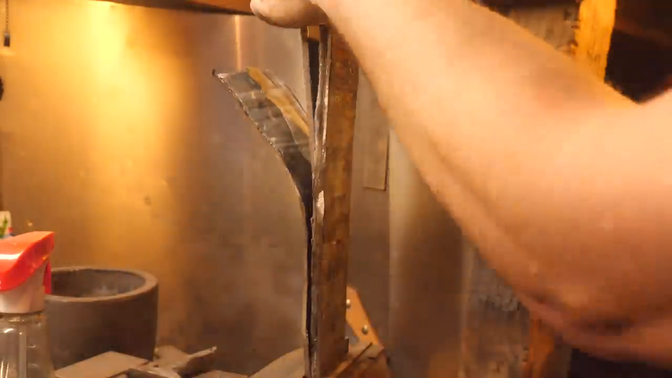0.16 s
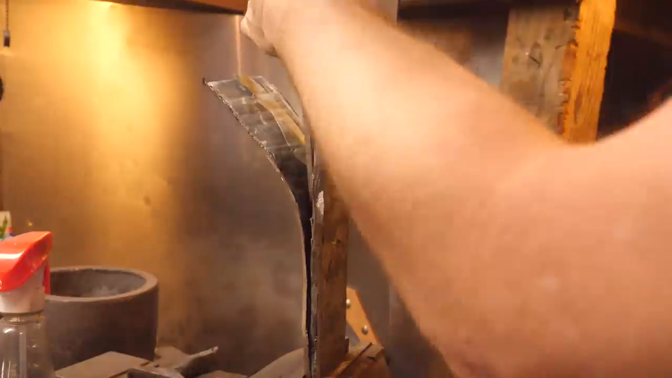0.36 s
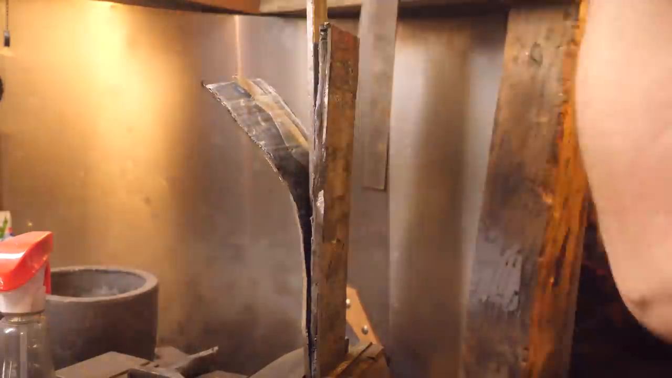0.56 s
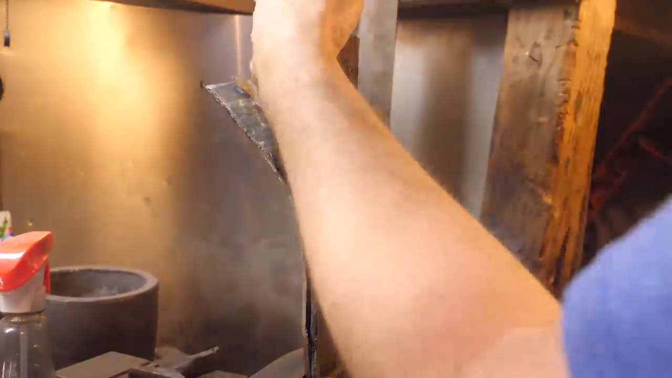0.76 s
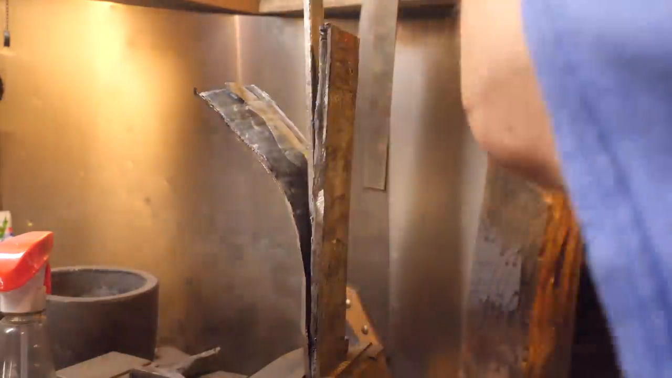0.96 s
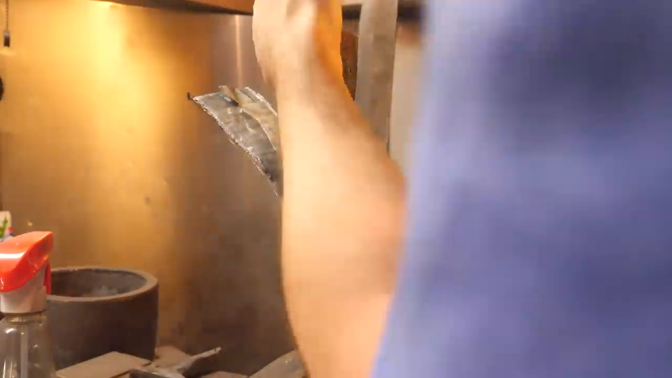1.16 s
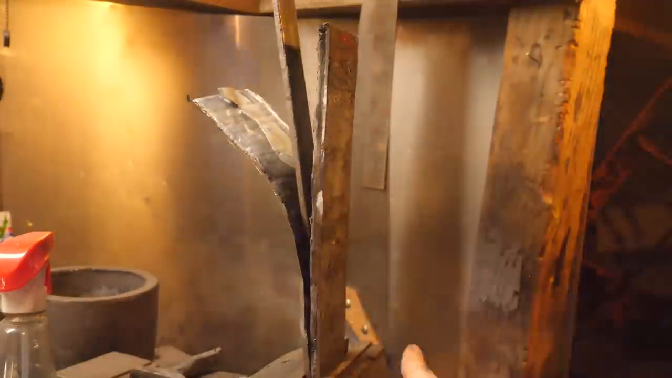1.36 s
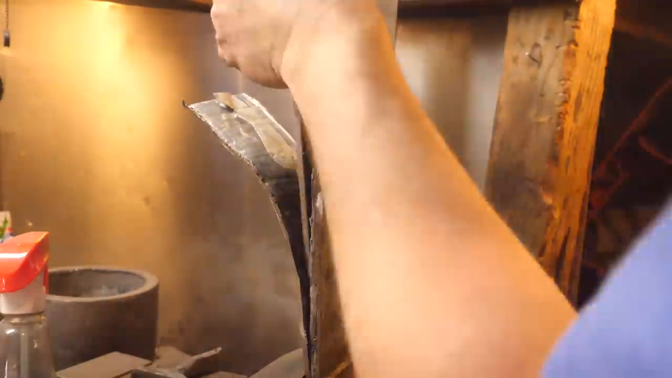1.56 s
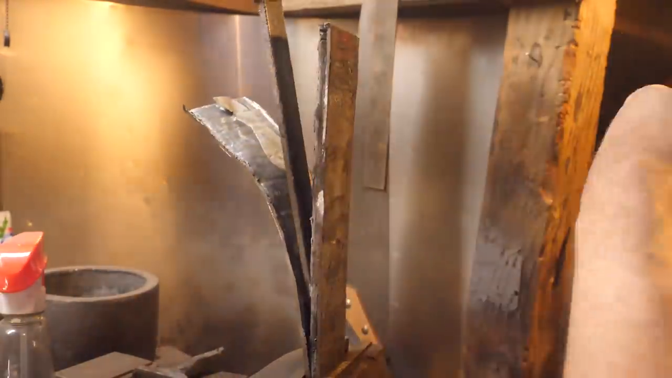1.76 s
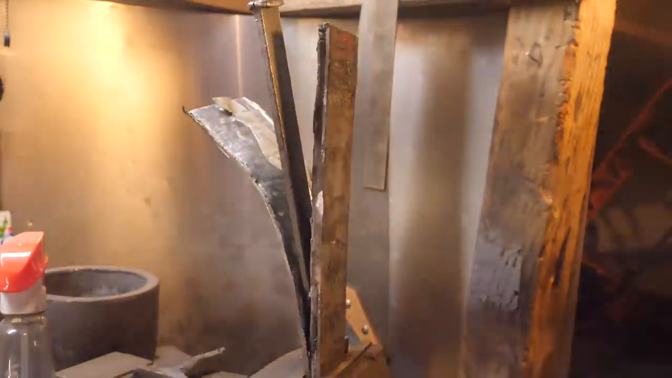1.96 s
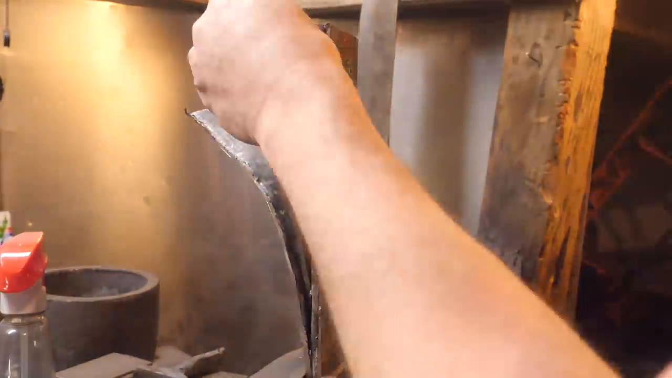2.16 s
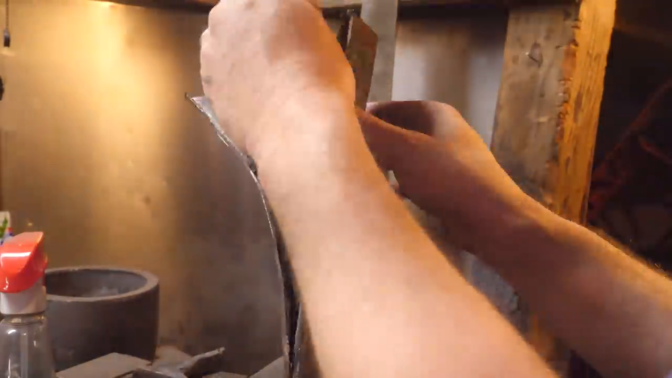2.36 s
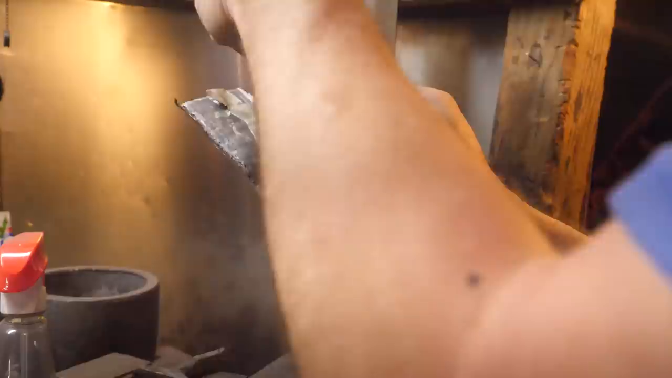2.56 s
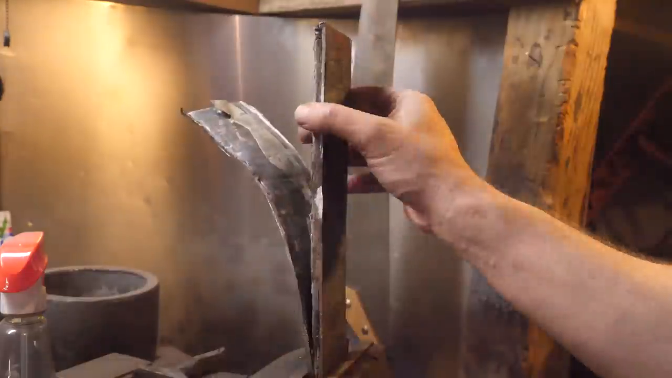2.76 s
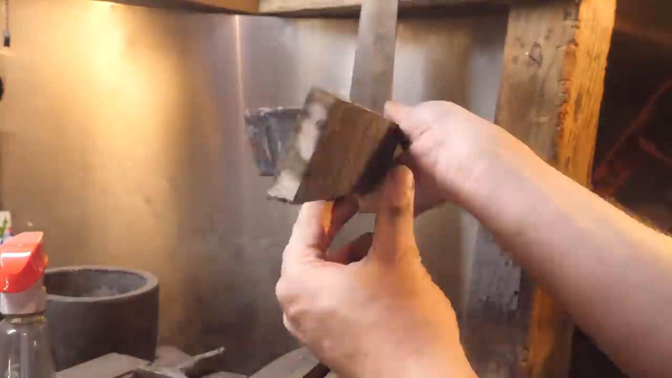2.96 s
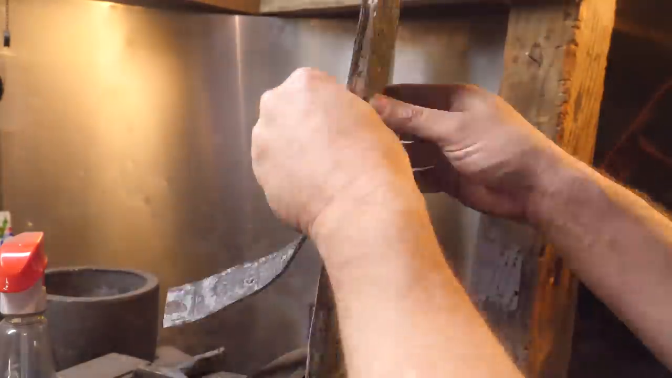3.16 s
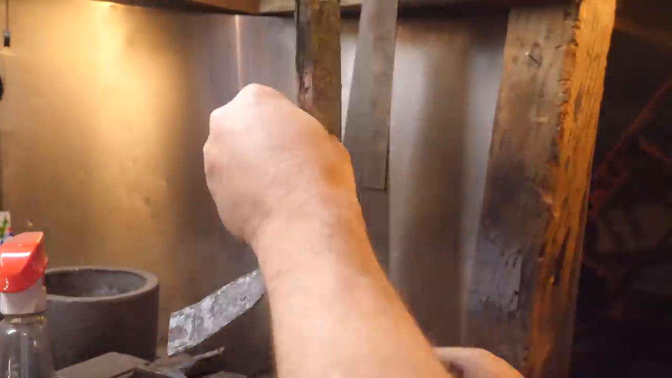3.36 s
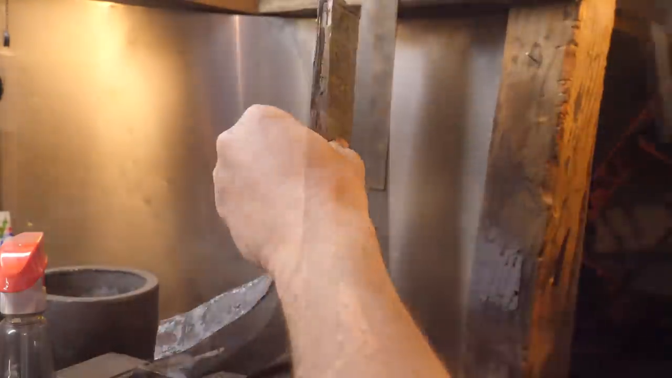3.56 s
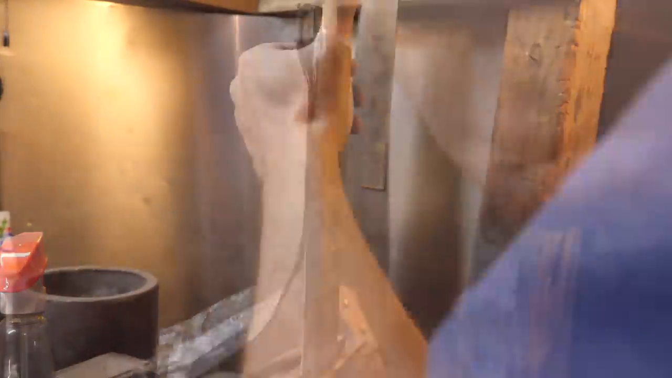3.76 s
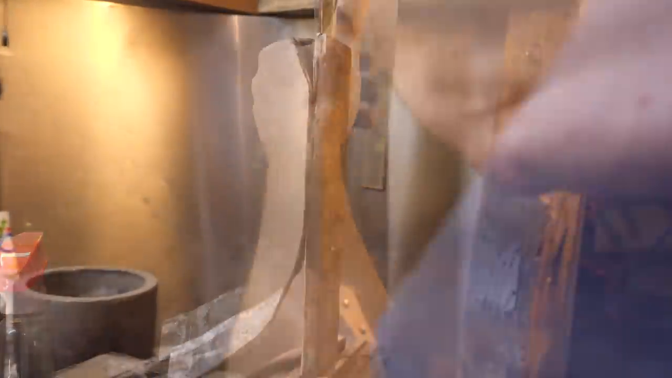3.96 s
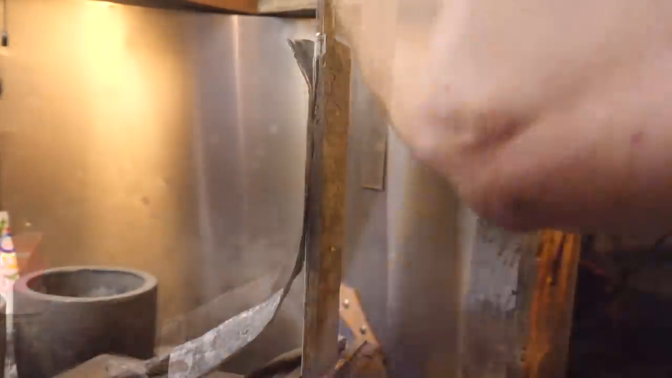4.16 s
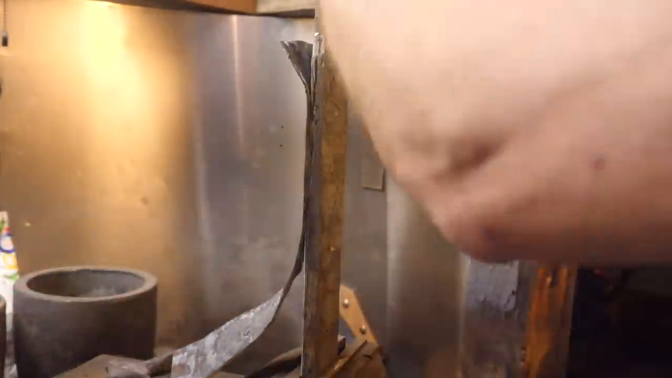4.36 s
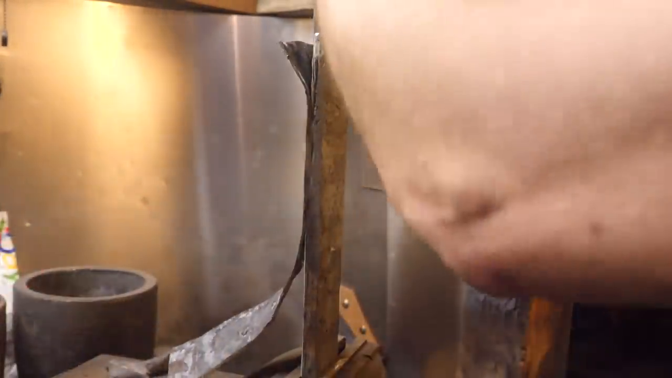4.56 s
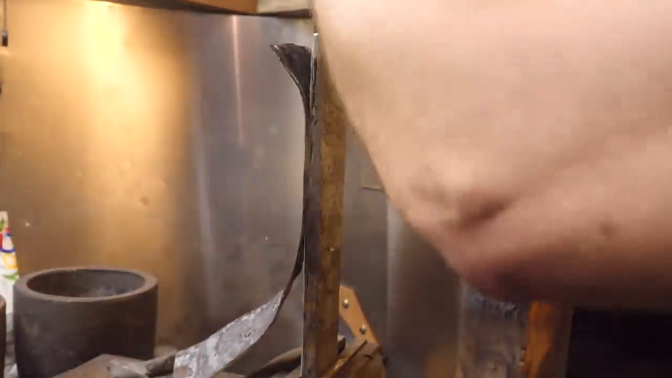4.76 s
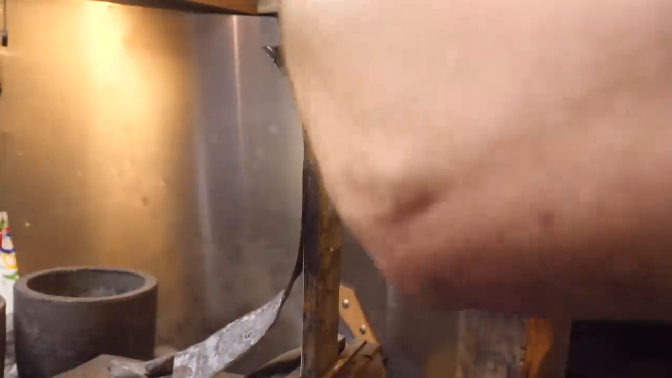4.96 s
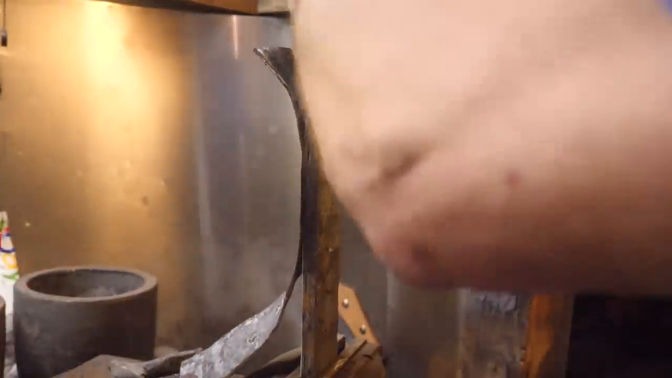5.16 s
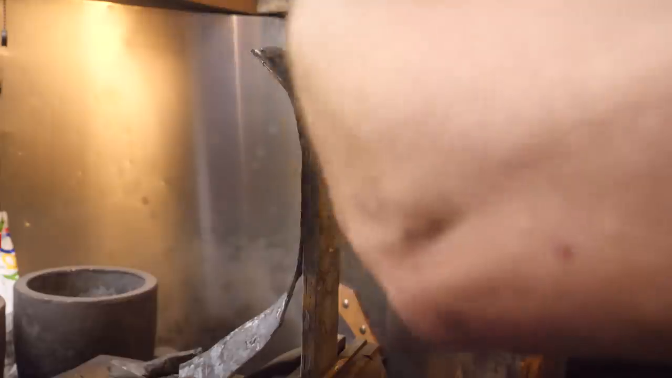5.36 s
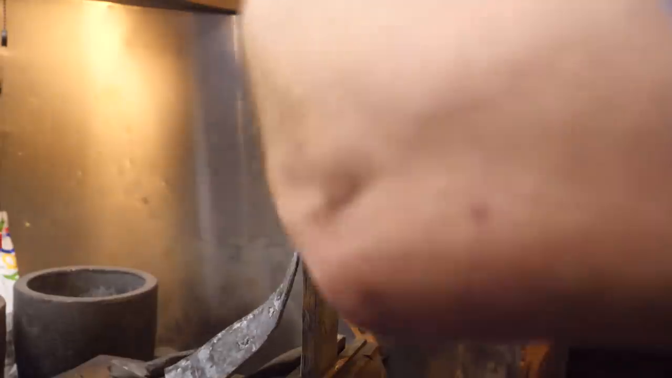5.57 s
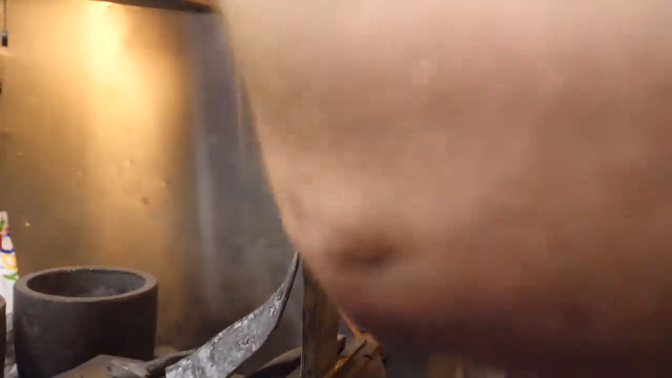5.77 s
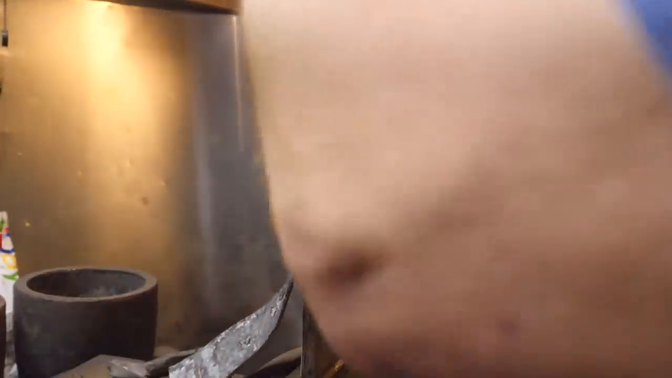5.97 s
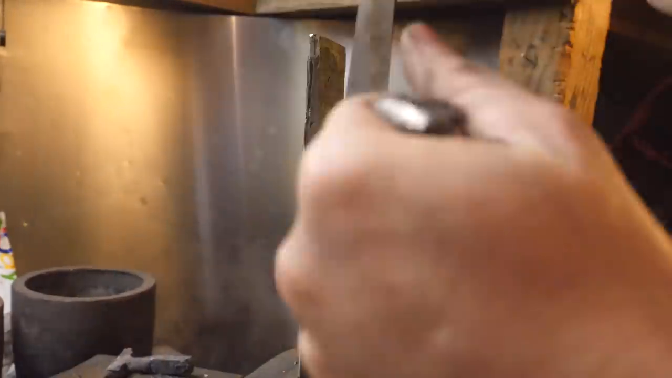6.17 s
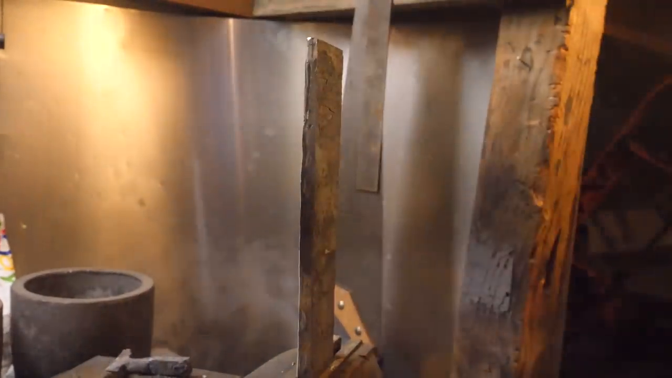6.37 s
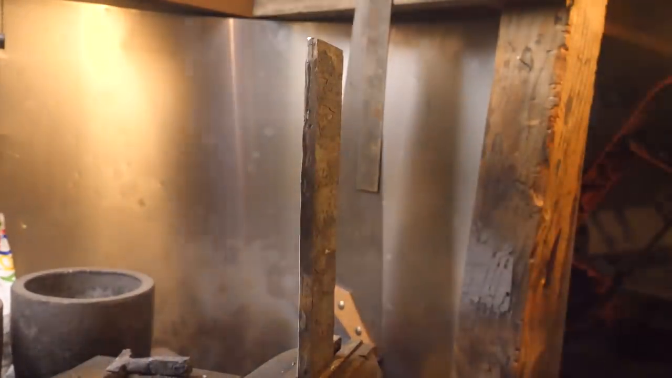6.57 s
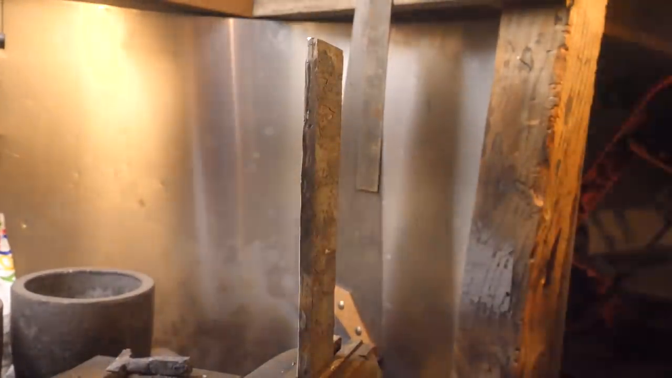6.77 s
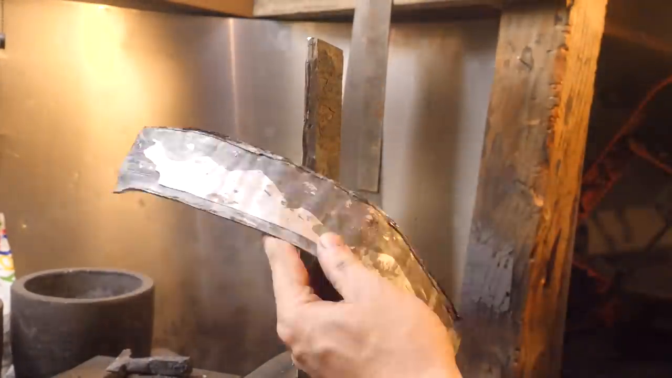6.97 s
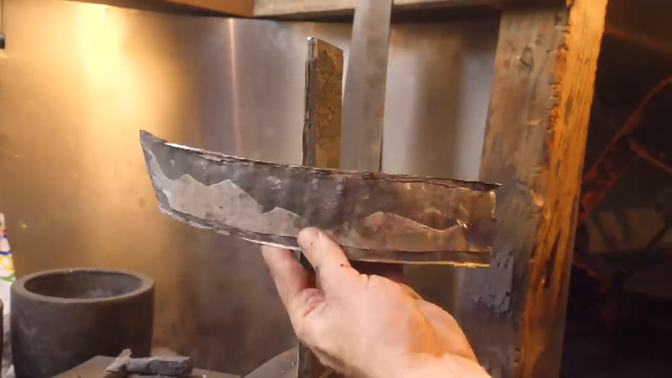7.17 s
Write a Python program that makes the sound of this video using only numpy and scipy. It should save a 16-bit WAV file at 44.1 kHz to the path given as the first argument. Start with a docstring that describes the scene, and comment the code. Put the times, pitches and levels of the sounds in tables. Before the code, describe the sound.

A small workshop heard close, with a heavy vise and bench. From 0 to 0.43 s, about 24 hard hammer blows a second ring off steel, each a bright crack, short dense ring and low boom. Blows become slower and uneven until 1.9 s, while a thin peeled strip begins to hum, falling in pitch. Room air sinks early. From 2.07 to 3.4 s, hands bend and knock the strip: dull knocks, hard clacks, sharp ticks and gritty scrapes. Around 3.45 s a fuller low rush of air enters, with two soft clacks. From 3.9 to 5.6 s, hammering is steady, about thirteen blows a second, with longer rings and a low wavering strip tone. Clatter at 5.7 s, three last blows near 6 s, then a strong scrape and rattling clang at 6.1-6.35 s. Light knocks follow over the air until just past 7 s.

```python
"""A small workshop: quick hammer blows drive a chisel down a steel bar in a vise and peel a thin strip off it,
in two runs. Each blow is a noise crack, a dense swelling ring, bar modes and a low boom; the strip sings along.
Between the runs the strip is bent, scraped and knocked by hand (filtered random slips); late on it clangs free.
A rush of air sinks early and returns fuller midway. Noise is drawn separately for left and right."""
import sys
import numpy as np
from scipy import signal
from scipy.fft import rfft, irfft, next_fast_len
from scipy.io import wavfile
from scipy.ndimage import uniform_filter1d, map_coordinates

SR = 44100
rng = np.random.default_rng(int(sys.argv[2]) if len(sys.argv) > 2 else 0)


def persist_wave(psi):
    """Save psi, clipped to +-1, as 16-bit WAV."""
    counts = np.round(np.clip(psi, -1, 1) * 32767).astype(np.int16)
    wavfile.write(sys.argv[1], SR, np.atleast_2d(counts).T)


N = 318446
TIME = np.arange(N) / SR
SPAN = np.arange(8192) / SR - 512 / SR  # time axis of one event [s], with a short lead-in

# hammer blows: (time [s], strength [dB], chisel note [Hz])
BLOWS = [(.0092, 1, 3470), (0.052, 0.5, 3497), (0.0969, 0, 4900), (.14, 0, 5100), (0.1833, 0.5, 5060),
         (0.2226, 0, 5370), (0.2639, -0.5, 5300), (.302, 0.5, 9780), (.341, -0.5, 9780),
         (0.3825, -0.5, 9780), (.4262, 0, 9900), (0.5385, -3, 5650), (0.594, -0.5, 9620), (.638, 0.5, 5350),
         (0.8075, -0.5, 5450), (0.8597, 1, 5500), (0.9339, -1, 3490), (0.9928, 2.4, 3666),
         (1.071, -2, 6130), (1.119, 1, 8400), (1.3473, -0.5, 3235), (1.4043, 0, 2020), (1.4648, -0.5, 5860),
         (1.5266, 0, 5290), (1.6778, -.5, 5450), (1.7436, 1.5, 5510), (1.815, -0.5, 3620),
         (1.9031, -1, 5350), (3.9024, 1.5, 9780), (3.9769, 2, 9880), (4.0489, 1, 6410), (4.1219, 1.5, 9800),
         (4.1961, 1, 4850), (4.2714, 1, 9930), (4.3494, 1, 5750), (4.4282, 0, 4660), (4.5013, 0, 5070),
         (4.582, .5, 5170), (4.6605, 0.5, 8280), (4.737, 1, 5310), (4.8179, 1, 5150), (4.896, 0, 4620),
         (4.9757, 1.5, 6480), (5.0536, -0.5, 3370), (5.1285, -1, 3320), (5.206, 1, 3990),
         (5.348, -2.5, 6350), (5.426, -1.2, 6440), (5.5023, 0.5, 6200), (5.5798, 0.5, 6330),
         (5.938, -3, 3120), (6.0038, -.5, 3040), (6.072, -0.5, 4300)]
# modes of the loose strip: (frequency [Hz], relative level [dB])
SHEET_MODES = [(1405, -47.5), (1922, -47.5), (2541, -52), (3300, -45.5), (3618, -48.5), (4070, -48),
               (4264, -49), (4753, -50.5), (5362, -51.5), (5604, -51), (6013, -62), (6751, -63),
               (7483, -67)]
RING_FOLLOWS = 0.78  # dB of ring per dB of blow strength


def amp(db):
    """Decibels to gain."""
    return 10 ** (np.asarray(db) / 20)


def unit(x):
    """Scale to rms 1."""
    return x / np.sqrt(np.mean(x ** 2) + 1e-20)


def along(points, hz):
    """Gain of (Hz, dB) points on a log frequency axis."""
    f, db = np.transpose(points)
    return amp(np.interp(np.log(hz + 1), np.log(f + 1), db))


def curves(rows):
    """One value per sample for each column after the time."""
    s, *cols = np.transpose(rows)
    return [np.interp(TIME, s, c) for c in cols]


def wobble(count, step):
    """Smooth random curve of count values with a knot every step values."""
    knots = rng.standard_normal(int(count / step) + 4)
    return map_coordinates(knots, [np.arange(count) / step])


def filtered(x, gain):
    """x through a gain that is a function of frequency."""
    m = next_fast_len(x.shape[-1])
    spectrum = rfft(x, m) * gain(np.fft.rfftfreq(m, 1 / SR))
    return irfft(spectrum, m)[..., :x.shape[-1]]


def noise(gain, count):
    """Coloured noise of rms 1, unrelated in the two ears."""
    return unit(filtered(rng.standard_normal((2, count)), gain))


def peaky(hz, depth_db, width_hz):
    """Each point of contact favours its own random resonances; the bass stays even."""
    return amp(depth_db * hz / (hz + 400) * wobble(len(hz), width_hz / hz[1]))


def grains(count, rate_hz, spread_db):
    """Sparse slips of very unequal size, rms 1."""
    hit = rng.random(count) < rate_hz / SR
    size = amp(spread_db * np.minimum(rng.exponential(size=count), 4))
    return unit(hit * size * rng.standard_normal((2, count)))


def ringing(modes, scatter_db, blur_hz):
    """Narrow noise bands on each mode, at new strengths, rms 1."""
    lines = [(f, amp(db + scatter_db * rng.standard_normal())) for f, db in modes]
    return noise(lambda hz: sum(g * np.exp(-((hz - f) / blur_hz) ** 2) for f, g in lines), len(SPAN))


def add(track, s, sound):
    """Mix a sound laid out on SPAN into the track at time s."""
    start = round((s + SPAN[0]) * SR)
    part = sound[:, max(-start, 0):N - start]
    track[:, max(start, 0):][:, :part.shape[1]] += part


def plateau(t, hold_s, fall_s):
    """Level holds for a while, then falls away."""
    return 1 / np.sqrt(1 + np.exp(np.minimum((t - hold_s) / fall_s, 80)))


def workshop(shared=0.3, flutter_db=0.9, hiss_db=-83, dip_edge_s=.003):
    """Rush of air, sinking early and fuller in the second half, with brief dips, over a faint hiss."""
    # background level: (time [s], level [dB])
    air_level = [(0, -52.5), (.5, -71.5), (1.3, -76), (2.9, -73), (3.42, -73), (3.47, -52.5), (3.65, -49),
                 (3.85, -52), (7.22, -51.5)]
    # air spectrum: (frequency [Hz], relative gain [dB])
    room_colour = [(15, -71), (25, -31), (130, -15.5), (223, -0.5), (354, -2), (545, -7), (714, -5.5),
                   (1190, -6.5), (1560, -7.5), (2280, -11), (4250, -17), (5280, -22), (13200, -36.5),
                   (14800, -66), (16000, -51)]
    # brief dips of the background: (start [s], end [s], depth [dB])
    level_dips = [(3.425, 3.474, 50), (6.225, 6.3, 24)]
    air = noise(lambda hz: along(room_colour, hz), N)
    centre = noise(lambda hz: along(room_colour, hz), N)[0]
    dip_db = 0
    for start, end, depth in level_dips:
        dip_db += depth * plateau(TIME, end, dip_edge_s) * (1 - plateau(TIME, start, dip_edge_s))
    level = amp(curves(air_level)[0] - dip_db + flutter_db * wobble(N, SR / 25))
    hiss = np.minimum(amp(hiss_db), level) * rng.standard_normal((2, N))
    return level * unit(air + shared * centre) + hiss


def damped(x, t, db_per_s_at_12k):
    """Treble dies faster, with the square of frequency."""
    centres_hz = [0, 3000, 6000, 9000, 12000, 16000]
    out = 0
    for f, weights in zip(centres_hz, np.eye(len(centres_hz))):
        band = filtered(x, lambda hz: np.interp(hz, centres_hz, weights))
        out = out + band * amp(-db_per_s_at_12k * (f / 12000) ** 2 * t)
    return out


def tilt(hz, bright_db):
    """Treble lift about 3 kHz: bright_db for each factor of 5.5 in frequency."""
    return amp(bright_db * np.log(np.clip(hz, 700, 12000) / 3000) / np.log(5.5))


def hammer(bar_db=-9, boom_db=-13, swell_s=0.0078, fall=0.26, crack_peaks_db=7.0, ring_peaks_db=2.0,
           linger_db=-21, linger_t60_s=0.24):
    """Each blow is a short bright crack; the dense ring of bar and wall swells behind it and dies."""
    # colour of crack and ring: (frequency [Hz], relative gain [dB])
    crack_colour = [(80, -7), (200, -34), (450, -4.5), (1100, -1), (2300, 0), (3400, 2.5), (4300, -2.5),
                    (5400, 2), (7400, -4.5), (8300, -1.5), (10500, -6.5), (12800, -4.5), (14800, -16),
                    (16000, -13.5)]
    ring_colour = [(80, -21.5), (200, -13.5), (450, -6), (1100, -3), (2300, -4.5), (3400, -5.5), (4300, -6),
                   (5400, -5), (7400, -11), (8300, -10), (10500, -18.5), (12800, -20.5), (14800, -43),
                   (16000, -58)]
    # modes of bar and chisel: (frequency [Hz], relative level [dB])
    bar_modes = [(1040, 1.5), (1610, 6), (1943, 4.5), (2495, 0), (2767, -36), (3165, -13), (3340, 2),
                 (3560, 6), (4340, -10.5), (5125, -17), (5320, 4.5), (5814, -21), (8130, -22), (9770, -29),
                 (12790, -51)]
    # stages as the strip grows: (start [s], ring time scale [s], ring brightness [dB], crack brightness [dB],
    # chisel note level [dB])
    stages = [(0, 0.019, 2, 5.5, -5.5), (.25, 0.019, -3, 4, -11.5), (.8, .0215, -2, 2, -5),
              (1.45, 0.024, -3, 6.5, -11), (3.8, 0.032, 3, 3, -11.5), (5.3, 0.029, 3, 2, -7.5),
              (5.55, .031, 7, 7.5, -5)]
    boom_colour = [(60, -25), (170, -9.5), (400, -7.5), (1100, -11.5), (2500, -47.5)]
    crack_db, ring_db = -32.5, -39  # for a blow of strength 0
    note_scatter_db, colour_scatter_db = 1, 1.5  # from blow to blow
    out, t = np.zeros((2, N)), np.maximum(SPAN, 0)
    for s, strength, note_hz in BLOWS:
        _, ring_s, ring_bright, crack_bright, note_db = stages[sum(s >= row[0] for row in stages[1:])]
        ring_bright, crack_bright = [ring_bright, crack_bright] + colour_scatter_db * rng.standard_normal(2)

        crack = noise(lambda hz: along(crack_colour, hz) * tilt(hz, crack_bright)
                      * peaky(hz, crack_peaks_db, 192.8), len(t))
        crack_s = 0.0039 * (ring_s / 0.031) ** 0.9  # longer rings follow longer cracks
        crack *= amp(crack_db + strength) * np.exp(-np.abs(SPAN / crack_s) ** 3)

        wash = noise(lambda hz: along(ring_colour, hz) * tilt(hz, ring_bright)
                     * peaky(hz, ring_peaks_db, 79.4), len(t))
        wash = damped(wash, t - .018, db_per_s_at_12k=441)
        chisel = ringing([(note_hz, 0)], scatter_db=0, blur_hz=56)
        chisel *= amp(note_db + note_scatter_db * rng.standard_normal())
        bar = amp(bar_db) * ringing(bar_modes, scatter_db=4, blur_hz=13)
        boom = amp(boom_db) * noise(lambda hz: along(boom_colour, hz), len(t))

        dying = lambda slow: plateau(t, 1.123 * ring_s, slow * fall * ring_s)
        body = (wash + bar) * dying(0.93) + chisel * dying(0.56)
        body += boom * dying(2.23)  # the boom of the bench outlasts the wash
        lowest = ringing(bar_modes[:1], scatter_db=0, blur_hz=4.8)
        body += amp(linger_db - 60 * t / linger_t60_s) * lowest  # the lowest mode lingers
        swell = 1 - np.exp(-t / swell_s)
        add(out, s, crack + amp(ring_db + RING_FOLLOWS * strength) * swell * body)
    return out


def strip(overtone_ratio=3.31, overtone_db=-6.5, swell_s=0.013, swing_db=-56.5, swing_t60_s=0.26):
    """Blows swing the strip's lowest two bending modes, lower as it lengthens; when long and floppy it wavers."""
    # pitch of the peeled strip: (time [s], pitch [Hz])
    strip_pitch = [(.76, 390.2), (1.05, 342.4), (1.42, 326), (1.52, 270), (1.73, 266.7), (1.77, 238.3),
                   (1.9, 236), (3.9, 198.8), (4.5, 188.6), (6, 202.4)]
    boost_hz, boost_width_hz, boost_db = 252, 45, 10.5  # the vise amplifies near its lowest resonance
    hz, = curves(strip_pitch)
    swing = np.zeros(N)
    t = np.arange(SR // 2) / SR
    for s, strength, _ in BLOWS:
        if s > strip_pitch[0][0]:  # once there is a strip, the chisel stops it and starts it anew
            part = swing[round(s * SR):][:len(t)]
            decay = amp(RING_FOLLOWS * strength - 60 * t / swing_t60_s)
            part[:] = (decay * (1 - np.exp(-t / swell_s)))[:len(part)]
    jolts = np.array([wobble(N, SR / 30), wobble(N, SR / 30)])  # one per ear
    waver = np.where(TIME < 3, .35, 1.5)  # phase [rad]; twice this is the level flutter [dB]
    phase = 2 * np.pi * np.cumsum(hz) / SR + waver * jolts
    tone = np.sin(phase) + amp(overtone_db) * np.sin(overtone_ratio * phase)
    boost = boost_db * np.exp(-((hz - boost_hz) / boost_width_hz) ** 2)
    level = amp(swing_db + boost + 2 * waver * wobble(N, SR / 20))
    return np.sqrt(2) * level * uniform_filter1d(swing, size=400) * tone


def bench_colour(hz):
    """The heavy vise and bench resonate under every contact."""
    # bench response: (frequency [Hz], relative gain [dB])
    bench_response = [(29, -70), (50, -11), (277, -4.5), (313, -8), (389, 0), (483, 2.5), (615, -3),
                      (2160, -13.5), (2560, -9), (3500, -27.5), (4240, -33), (6090, -29.5), (12900, -31.5),
                      (16000, -47)]
    # vise resonances: (frequency [Hz], width [Hz], boost [dB])
    vise_modes = [(246, 30, 7.5), (363.4, 51, 13), (492, 29, 0), (617, 22, 9.5), (840, 44, 3),
                  (846, 11, 0.5), (1130, 51, -2.5), (1356, 44, 5)]
    resonances = amp(sum(db / (1 + ((hz - f) / (width / 2)) ** 2) for f, width, db in vise_modes))
    low_cut = hz ** 2 / (hz ** 2 + 110 ** 2)
    return along(bench_response, hz) * resonances * low_cut


def scattered(x, t60_s):
    """Nearby tools and walls smear each slip into a short dense echo."""
    t = SPAN[SPAN >= 0]
    echo = rng.standard_normal((2, len(t))) * amp(-60 * t / t60_s)
    return signal.fftconvolve(x, echo, axes=1)[:, :x.shape[1]]


def handling(knock_db=-1.5, thud_db=-15, clack_db=0.5, tick_db=-8, note_db=-3, clink_db=-13, rise_s=0.0013):
    """Steel chatters on steel, then each band dies at its own rate; a hard touch ticks, a soft one knocks."""
    # knocks and scuffs: (time [s], length scale [s], level [dB], hardness [dB], favoured resonance [Hz])
    contacts = [(1.226, 0.02, -60.5, 1, 458), (1.281, 0.012, -59, 10, 9700),
                (1.603, 0.011, -51, -4.5, 1020), (2.0736, 0.042, -43, -9, 473),
                (2.112, 0.042, -41.5, -7.5, 490), (2.152, 0.013, -47.5, -8.5, 473),
                (2.189, .026, -40.5, -1.5, 880), (2.27, 0.013, -37.5, 0.5, 1760),
                (2.308, .0083, -50.5, 1, 1570), (2.347, 0.023, -53.5, 2.5, 3180),
                (2.4024, 0.014, -39.5, 0, 500), (2.4494, 0.008, -53.5, 17, 10300),
                (2.585, .02, -63, -9, 940), (2.6202, 0.013, -46.5, 11, 5260), (2.661, 0.014, -64, -17, 450),
                (2.6936, 0.012, -46.5, -1.5, 940), (2.764, 0.013, -46.5, 1.5, 2550),
                (2.7898, .004, -45, 15.5, 3800), (2.862, 0.037, -45.5, -11.5, 443),
                (2.8847, 0.04, -45.5, -10, 640), (2.952, 0.027, -44.5, 4, 4200),
                (2.9628, 0.022, -41.5, -1.5, 1890), (2.997, 0.0091, -37.5, 5, 4180),
                (3.1349, .005, -38, 6.5, 4030), (3.142, 0.024, -48, -2, 2620),
                (3.172, .0068, -51.5, -2, 530), (3.218, 0.025, -44.5, 3.5, 6670),
                (3.258, .032, -46.5, 1, 1810), (3.293, 0.0069, -42.5, 5, 3250),
                (3.357, 0.029, -55, -11, 594), (3.403, 0.0069, -57.5, 5.5, 12100),
                (3.666, 0.013, -44.5, 2.5, 1910), (3.74, .024, -47, -1, 1260), (5.288, .008, -50, -8, 460),
                (5.6693, .034, -40.5, 4.5, 4130), (5.7276, 0.077, -42, 0.5, 1080),
                (5.852, 0.015, -47, 3.5, 4000), (6.143, 0.033, -43.5, -8, 604),
                (6.186, .016, -41.5, 1, 450), (6.211, 0.0035, -40.5, -3, 600),
                (6.254, 0.009, -52.5, 1, 2620), (6.305, 0.013, -43.5, -3.5, 1570),
                (6.518, 0.034, -47.5, 3.5, 1880), (6.695, 0.022, -46.5, -3.5, 696),
                (6.9, .01, -51.5, 3.5, 980), (6.998, 0.0095, -51, 1, 730)]
    # band shapes: (frequency [Hz], relative gain [dB])
    deep_band = [(30, -17), (110, -6), (220, 10), (400, -8), (1500, -70)]
    low_band = [(250, 0.5), (750, 6.0), (1200, -6.5), (2500, -52), (6000, -60)]
    middle_band = [(400, -30.0), (950, 2.0), (1700, 6), (2800, -2.5), (4500, 10.0), (9000, -60)]
    high_band = [(800, -65), (2200, -23.5), (4000, 3.5), (8000, 2), (14000, -7.5)]
    out, t = np.zeros((2, N)), np.maximum(SPAN, 0)
    for s, length, level, hardness, note_hz in contacts:
        chatter = scattered(grains(len(t), rate_hz=3200, spread_db=1.5), t60_s=0.0096)
        deep = filtered(chatter, lambda hz: along(deep_band, hz))
        chatter = filtered(chatter, lambda hz: bench_colour(hz) * peaky(hz, 4.2, 126.2))
        low = filtered(chatter, lambda hz: along(low_band, hz))
        middle = filtered(chatter, lambda hz: along(middle_band, hz))
        high = filtered(chatter, lambda hz: along(high_band, hz))
        resonance = ringing([(note_hz, 0)], scatter_db=0, blur_hz=90 + 0.019 * note_hz)
        clink = ringing(SHEET_MODES[3:], scatter_db=2.5, blur_hz=30.4)  # the strip's upper modes
        press = (1 - np.exp(-t / rise_s)) * amp(-3 * np.minimum(t / length, 1))
        touching = (SPAN > 0) * (SPAN < length + .008)
        bands = ((deep, thud_db - hardness / 2, .1),  # (sound, level [dB], t60 [s])
                 (low, knock_db - hardness, .1),
                 (middle, clack_db, .08),
                 (high, tick_db + hardness, .06),
                 (resonance, note_db, .05),
                 (clink, clink_db + hardness, .09))
        for band, db, t60_s in bands:
            even = band / np.std(band[:, touching], axis=1, keepdims=True)
            decay = amp(-60 * np.maximum(t - 0.71 * length, 0) / t60_s)
            add(out, s, amp(level + db) * even * press * decay)
    return out


def stroke(s, length_s, attack_s=.006, release_s=0.0058, sag_db=2):
    """Pressure of one stroke: it bites, eases and lets go."""
    t = np.maximum(TIME - s, 0)
    sag = amp(-sag_db * np.minimum(t / length_s, 1))
    return (1 - np.exp(-t / attack_s)) * sag * plateau(t, length_s, release_s)


def scraping(rub_db=-11, grit_db=-9):
    """Scaly steel drags over the bar in tiny uneven slips."""
    # strokes of the strip along the bar, levels ahead of rub_db and grit_db:
    # (time [s], length [s], relative rub [dB], relative grit [dB])
    strokes = [(2.178, 0.27, -48, -55.5), (2.384, 0.074, -45, -58), (2.492, 0.13, -56, -64.5),
               (2.613, .17, -47.5, -49.5), (2.926, 0.041, -48, -51.5), (3.13, 0.026, -50, -66),
               (3.214, 0.15, -38.5, -49.5), (6.145, .072, -31, -43)]
    grit_colour = [(1000, -9.0), (4000, -10.5), (10000, -8), (15000, -17)]
    rub, grit = sum(amp([[r], [g]]) * stroke(s, length) for s, length, r, g in strokes)
    low_slips = scattered(grains(N, rate_hz=900, spread_db=5), t60_s=0.04)
    low = unit(filtered(low_slips, bench_colour))
    high_slips = scattered(grains(N, rate_hz=1200, spread_db=4.0), t60_s=0.024)
    high = unit(filtered(high_slips, lambda hz: along(grit_colour, hz)))
    unevenness = amp(5.4 * wobble(N, SR / 60))
    return unevenness * (amp(rub_db) * rub * low + amp(grit_db) * grit * high)


def clangs(flutter_db=2):
    """The freed strip rattles against the bar and rings in its own modes."""
    # clangs: (peak time [s], rise [s], fall [s], level [dB], brightness [dB per octave],
    # rattle relative to ring [dB])
    clang_list = [(6.118, .055, 0.041, -39.5, -4, -11), (6.302, .018, .024, -46, -4, -2),
                  (6.334, .013, .056, -37.5, 4.5, -1.5)]
    rattle_colour = [(200, -12), (1500, -5), (3500, 0), (5600, 0), (7400, -7), (8600, -5),
                     (10500, -14), (15000, -28)]
    out = np.zeros((2, N))
    for s, rise, fall, db, bright, rattle_db in clang_list:
        t = SPAN - 2 * rise  # zero at the peak
        modes = [(f, level + bright * np.log2(f / 3000)) for f, level in SHEET_MODES]
        rattle = noise(lambda hz: along(rattle_colour, hz) * peaky(hz, 4, 70), len(t))
        rattle *= amp(rattle_db + flutter_db * wobble(len(t), SR / 150))
        shape = np.exp(-np.abs(t / np.where(t < 0, rise, fall)) ** 1.35)
        ring = ringing(modes, scatter_db=1, blur_hz=18)
        add(out, s - 2 * rise, amp(db) * shape * (ring + rattle))
    return out


def scene():
    """All the sources together."""
    return workshop() + hammer() + strip() + handling() + scraping() + clangs()


def record(dry, top_hz=15700):
    """Steep cut of the treble above top_hz."""
    return filtered(dry, lambda hz: 1 / np.sqrt(1 + (hz / top_hz) ** 120))


dry = scene()
out = record(dry)
persist_wave(out)
```